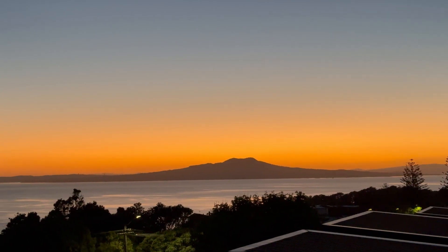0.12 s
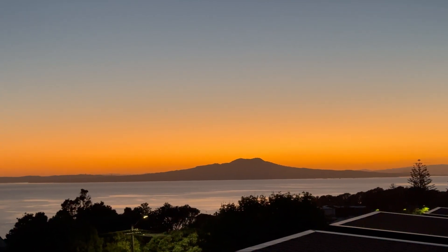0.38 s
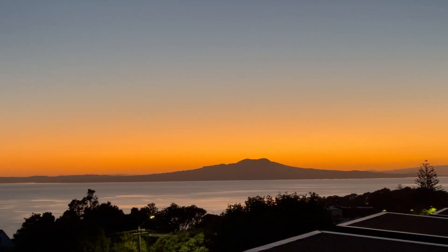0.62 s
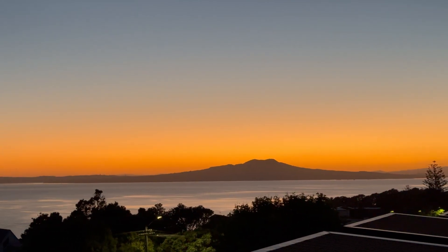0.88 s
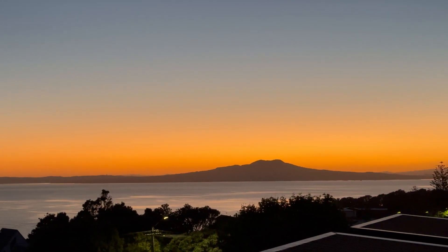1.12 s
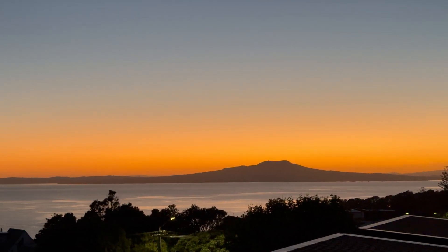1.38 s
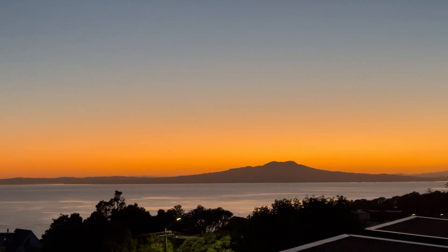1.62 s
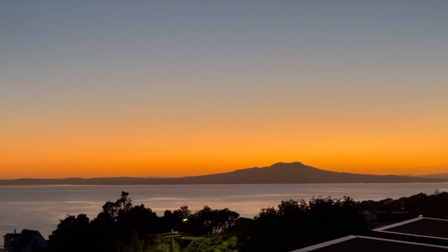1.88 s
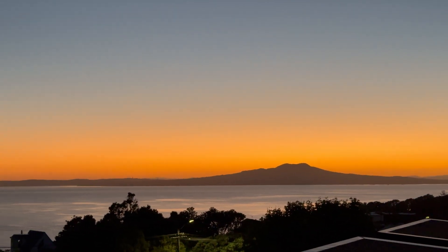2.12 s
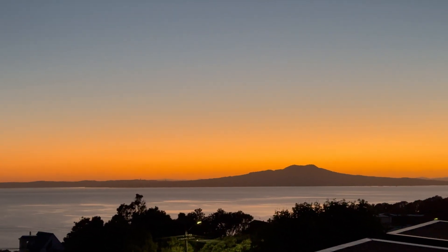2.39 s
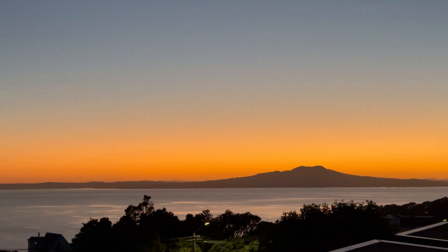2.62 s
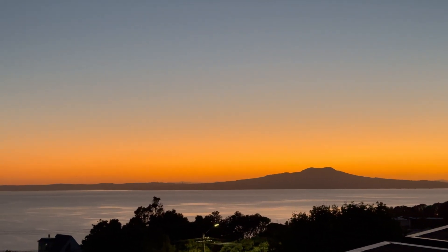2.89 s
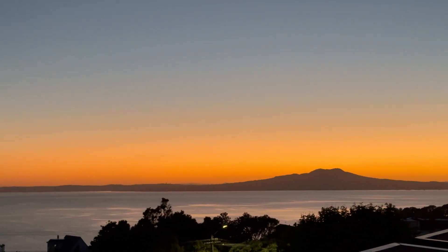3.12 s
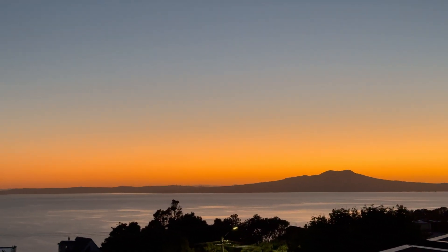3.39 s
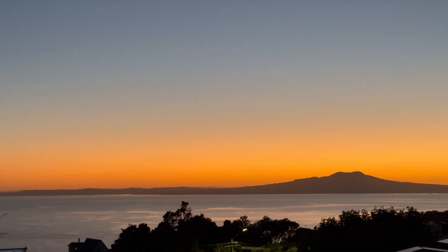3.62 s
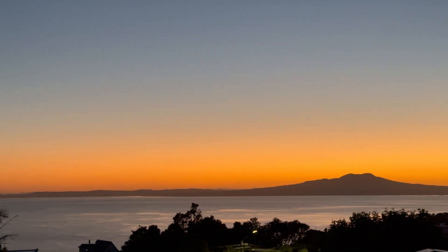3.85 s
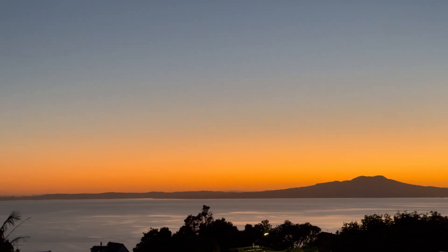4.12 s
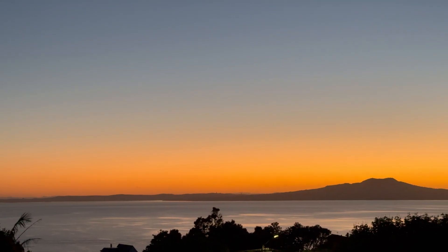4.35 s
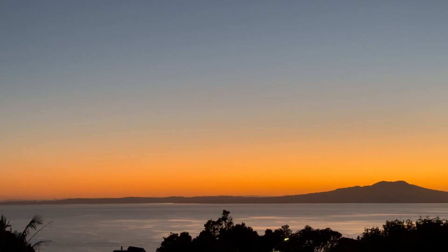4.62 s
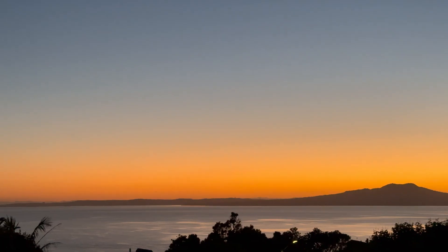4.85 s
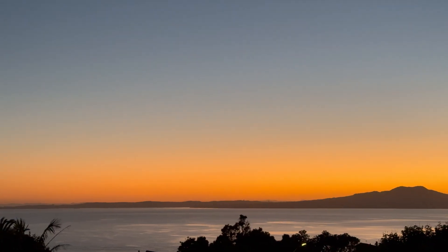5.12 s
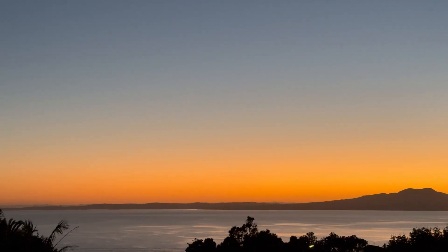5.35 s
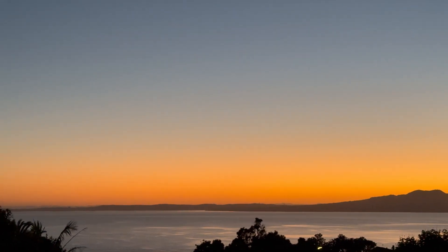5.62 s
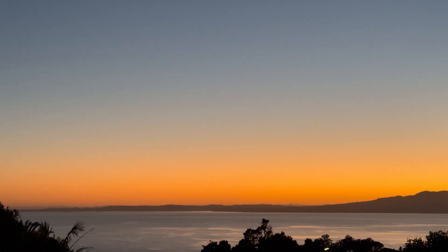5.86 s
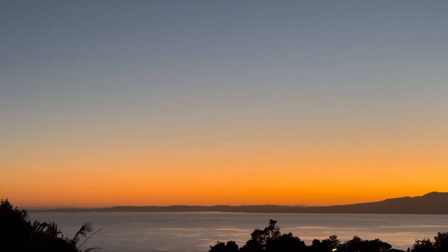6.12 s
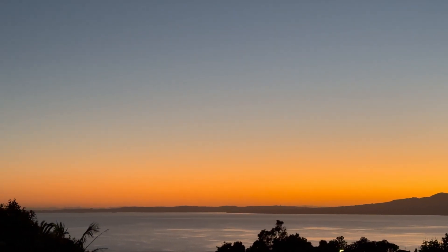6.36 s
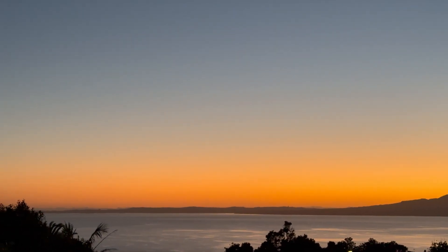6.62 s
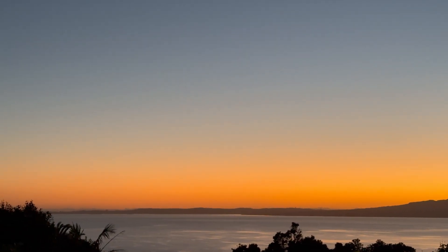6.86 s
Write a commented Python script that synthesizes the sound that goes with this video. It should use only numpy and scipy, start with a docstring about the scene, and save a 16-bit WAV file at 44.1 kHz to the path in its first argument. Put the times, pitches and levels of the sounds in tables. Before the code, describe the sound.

Open garden at dawn, heard through a small stereo microphone. Busy twittering and thin whistles open, cut by two bright near chirps with a dry, rapid rattle between them. Fluid gliding notes follow, joined by a burst of far sparrow chatter, then softer chopped trills and sparser calls. Everything rings gently off trees and walls above a quiet, smooth rumble of town and sea, with slight deep breeze.

```python
"""Dawn chorus from a hillside garden above a bay, a two-port microphone in the open; 7 s.
Throughout, distant singers merge into a wash of short glides over noise-made rumble of town and sea, with breeze.
First come whistles and far sparrows; a shaking near chirp at 0.3 s, a rattle of quick falls at 0.7 s, a second at 1.2 s.
Then gliding, mostly thrush-like notes and chopped trills lead; far sparrows, warbling sines, return from 2.8 and 6.1 s.
Random echoes stand for trees and house walls and smear every note; a treble hiss follows the birds' loudness."""
import sys
import numpy as np
from scipy import signal
from scipy.fft import rfft, irfft
from scipy.io import wavfile
from scipy.ndimage import uniform_filter1d

SR = 44100
rng = np.random.default_rng(int(sys.argv[2]) if len(sys.argv) > 2 else 0)


def log_audio(samples):
    """Write samples as a 16-bit WAV file to the path given in sys.argv[1]."""
    # one column per channel
    frames = np.atleast_2d(samples).T
    # limit to full scale, then quantise
    limited = np.clip(frames, -1, 1)
    pcm = np.round(limited * 32767).astype(np.int16)
    wavfile.write(sys.argv[1], SR, pcm)


def field_ratio(decibels):
    """Amplitude ratio for a level in dB (20 dB per decade); scalars and array-likes work."""
    return 10 ** (np.asarray(decibels, dtype=float) / 20)


N = 308259
T = np.arange(N) / SR  # time [s]

# Bird levels are those of the dry voice, ahead of echoes and microphone response.
# town and sea, ahead of small random swells: (time [s], level [dB])
RUMBLE_LEVEL = [(0.0, -54), (1.2, -54), (1.8, -57), (3.2, -56.5), (5.12, -60), (6.99, -57.5)]
# breeze on the microphone: (time [s], level [dB])
BREEZE_LEVEL = [(0, -54), (.7, -69.5), (1.2, -57), (1.9, -64.5), (2.7, -73), (3.3, -63.5), (4.2, -86.5),
                (5.4, -79.5), (6.2, -62), (6.99, -61)]
# rumble spectra, common to both ports and differing between them: (frequency [Hz], relative level [dB per Hz])
RUMBLE_MID_SPECTRUM = [(20, -53), (40, -28), (63, -9), (109, -1), (260, -9.5), (385, -11.5), (800, -20.5),
                       (1470, -24.5), (2500, -13.5), (4000, -39.5), (5200, -53.5), (13400, -57)]
RUMBLE_SIDE_SPECTRUM = [(15, -51.5), (25, -15), (98, -3), (705, -3), (1510, -12), (2920, -27.5),
                        (3330, -35), (4440, -41.5), (6590, -42), (13400, -40)]
# wash of distant singers, echoes included: (time [s], level [dB])
CROWD_LEVEL = [(0.0, -61.5), (0.53, -51), (1.3, -56), (1.8, -65.5), (2.3, -67.5), (2.9, -62.5),
               (3.5, -69.5), (4.3, -55), (5.1, -67.5), (5.6, -71.5), (5.9, -94.5), (6.11, -76.5),
               (6.5, -60), (6.99, -66)]
# far sparrows, one table a chirp, ahead of warble and flutter: (time [s], pitch [Hz], level [dB])
FAR_CHIRPS = [
    [(0.0, 4130, -41.5), (.03, 4060, -69)],
    [(.068, 4530, -53), (.085, 4560, -56), (.104, 4750, -49.5), (.122, 4190, -51.5), (.15, 4100, -55.5),
     (.16, 4000, -61)],
    [(.163, 4150, -56), (.2, 4040, -54.5), (.215, 3480, -52), (.232, 3170, -49), (.262, 2840, -64)],
    [(.61, 3960, -44), (.64, 4270, -50), (.662, 4100, -35)],
    [(.665, 5020, -46), (.685, 4810, -44), (.697, 3984, -39), (.718, 4123, -40), (.75, 3995, -53),
     (.815, 3910, -55)],
    [(.865, 3900, -39), (.9, 3900, -60.5), (.93, 4050, -66), (.96, 4120, -56.5), (.995, 4130, -56.5)],
    [(1.003, 4420, -67), (1.015, 5080, -66), (1.035, 4720, -50), (1.045, 4500, -47.5), (1.052, 3565, -48),
     (1.085, 3580, -62), (1.12, 3526, -51), (1.2, 3600, -72)],
    [(2.83, 4460, -59), (2.842, 5500, -68.5), (2.855, 4600, -55), (2.874, 4700, -50), (2.884, 3960, -54),
     (2.91, 4055, -50.5), (2.945, 4280, -60)],
    [(2.944, 5630, -65), (2.955, 4720, -54.5), (2.97, 4440, -48), (3.0, 3917, -47), (3.03, 3790, -58.5),
     (3.065, 3700, -54)],
    [(3.102, 5950, -63), (3.122, 4270, -52), (3.135, 4290, -54.5)],
    [(3.138, 5300, -51), (3.152, 4250, -51), (3.17, 3950, -50.5), (3.19, 4290, -56), (3.215, 3976, -56),
     (3.24, 4260, -54), (3.268, 4150, -54.5), (3.285, 4030, -64)],
    [(3.172, 4500, -54), (3.195, 4750, -54.5), (3.24, 4650, -69), (3.28, 4500, -58)],
    [(3.368, 4770, -62.5), (3.388, 4620, -59.5), (3.4, 3650, -31.5)],
    [(3.412, 4400, -47), (3.435, 4180, -58), (3.46, 4270, -45), (3.51, 4250, -76)],
    [(3.52, 3170, -58), (3.54, 3900, -61.5), (3.548, 5600, -75), (3.56, 5030, -69), (3.72, 4880, -93)],
    [(3.585, 4500, -50), (3.615, 4490, -54), (3.63, 3930, -46), (3.66, 3937, -42.5), (3.705, 3870, -74)],
    [(3.745, 4700, -68.5), (3.765, 3920, -47), (3.805, 3884, -49.5), (3.845, 4080, -54), (3.88, 3830, -58),
     (3.92, 3870, -57), (3.95, 4110, -55), (3.97, 3790, -61)],
    [(4.008, 4090, -95), (4.1, 4035, -74), (4.18, 3566, -70.5)],
    [(4.478, 3700, -81), (4.72, 3530, -74)],
    [(6.4, 3500, -65), (6.44, 3090, -71), (6.5, 3080, -68)],
    [(6.112, 4350, -68.5), (6.135, 4060, -63.5), (6.155, 3930, -60.5), (6.19, 3820, -73), (6.22, 3740, -65),
     (6.265, 3595, -54.5), (6.3, 3250, -61)],
    [(6.318, 3275, -52.5), (6.342, 4020, -53), (6.38, 4460, -65.5), (6.4, 4400, -54.5), (6.425, 4000, -62),
     (6.44, 3950, -49.5), (6.46, 3870, -75), (6.5, 3560, -49.5)],
    [(6.325, 4720, -55.5), (6.385, 5000, -67), (6.425, 4800, -64)],
    [(6.575, 4500, -65), (6.61, 4070, -56.5), (6.65, 3700, -55), (6.675, 3990, -55), (6.69, 3520, -56),
     (6.72, 3510, -61)],
    [(6.768, 3640, -50), (6.79, 3503, -60), (6.815, 3410, -54)],
    [(6.862, 4500, -66), (6.88, 4070, -59), (6.9, 3630, -58), (6.915, 3960, -62)],
    [(6.922, 3850, -50), (6.945, 4110, -54), (6.965, 4010, -58), (6.989, 3950, -52.5)],
]
# single whistles, each a glide through three pitches, level partway through:
# (time [s], length [s], start pitch [Hz], middle pitch [Hz], end pitch [Hz], level [dB])
WHISTLES = [ (0.09, 0.15, 3070, 3040, 2800, -58), (0.028, 0.02, 3350, 3560, 3380, -64.5),
            (0.154, 0.045, 2990, 3090, 2870, -58.5), (0.935, 0.086, 1919, 2266, 2225, -47),
            (1.077, 0.079, 1770, 1704, 1720, -64), (1.104, 0.084, 3200, 3030, 2980, -56.5),
            (1.32, 0.12, 3270, 3150, 3120, -60.5), (1.328, 0.14, 4440, 3980, 3630, -53),
            (1.517, 0.047, 2383, 2320, 2060, -51), (1.577, 0.046, 3075, 3000, 3030, -55),
            (1.71, 0.16, 1800, 1950, 2034, -62), (1.801, 0.024, 2890, 3780, 3220, -58),
            (1.834, 0.03, 2780, 3420, 3900, -54.5), (2.127, 0.11, 2360, 2026, 2015, -60),
            (2.262, 0.025, 2905, 2930, 2930, -59), (2.334, 0.14, 3240, 3570, 3410, -60.5),
            (2.418, 0.13, 1820, 2000, 2100, -58), (2.565, 0.11, 2720, 2730, 2990, -54),
            (2.644, .07, 3900, 3870, 4160, -61), (2.755, 0.12, 1582, 1762, 1485, -50.5),
            (2.8, 0.034, 3620, 3540, 3460, -54), (3.024, 0.074, 2045, 2084, 1970, -45),
            (3.114, 0.028, 1860, 1972, 2030, -48.5), (3.072, 0.048, 2384, 2500, 2370, -47),
            (3.201, 0.062, 1836, 1700, 1510, -56), (3.345, .025, 3610, 3290, 3100, -51),
            (3.358, 0.095, 3250, 3163, 3150, -52.5), (3.462, 0.042, 3100, 2830, 2660, -51.5),
            (3.779, 0.031, 3170, 3220, 3500, -45.5), (4.1, 0.062, 1730, 1645, 1985, -57),
            (4.142, 0.067, 1886, 1813, 1665, -59.5), (4.139, 0.084, 3580, 3790, 3930, -65),
            (4.215, 0.061, 6400, 8300, 7200, -75), (4.342, 0.081, 3980, 3970, 3700, -64),
            (4.496, 0.045, 3650, 3650, 3990, -63), (4.207, 0.04, 3580, 3040, 2647, -74),
            (4.577, 0.07, 2450, 2496, 2427, -57.5), (4.623, 0.076, 1960, 2068, 2030, -56),
            (4.815, 0.11, 2790, 2790, 2920, -64.5), (6.053, 0.069, 2360, 2390, 2410, -61),
            (1.985, 0.1, 2673, 2740, 2530, -64), (6.348, 0.078, 2930, 2670, 2880, -53.5),
            (6.697, 0.065, 2197, 2360, 2295, -58.5), (6.43, 0.054, 2110, 2320, 2230, -68.5),
            (6.937, 0.033, 2970, 3140, 2960, -69), (6.519, 0.031, 2380, 2374, 2320, -62.5),
            (6.56, 0.04, 2470, 2180, 2100, -67), (6.789, 0.067, 2330, 2470, 2820, -71),
            (3.738, 0.037, 2800, 2880, 2990, -51.5), (6.901, 0.061, 2550, 2770, 2500, -58.5),
            (6.955, 0.023, 2620, 2500, 2390, -49.5), (6.88, 0.1, 2340, 2220, 2200, -59)]
# low level hoots of a distant bird, level partway through: (time [s], length [s], pitch [Hz], level [dB])
HOOTS = [ (.044, 0.014, 1360, -47), (.09, 0.037, 1300, -65), (.47, 0.39, 1300, -71.5),
         (.49, 0.032, 1710, -70), (.56, 0.019, 1434, -50), (.66, 0.16, 1260, -65), (1.73, 0.086, 1305, -70),
         (1.92, 0.057, 1286, -68.5), (2.05, 0.071, 1320, -70.5), (3.0, 0.09, 1255, -69),
         (3.14, 0.054, 1150, -56.5), (4.49, 0.064, 1373, -75), (4.64, 0.078, 1385, -73.5),
         (4.89, 0.037, 1413, -63.5), (5.02, 0.075, 1392, -70), (5.08, 0.035, 1032, -63.5)]
# gliding phrases and short notes, mostly thrush-like, one high and thin, one table each:
# (time [s], pitch [Hz], level [dB])
PHRASES = [
    [(1.76, 1700, -58), (1.792, 1877, -46.5), (1.85, 1890, -47.5), (1.9, 1740, -53.5), (1.94, 1627, -53.5),
     (1.99, 1633, -49), (2.03, 1874, -47), (2.099, 1861, -68)],
    [(2.109, 2380, -51), (2.132, 2216, -39.5), (2.146, 2200, -52.5)],
    [(2.147, 2388, -34.5), (2.175, 2503, -45), (2.2, 2385, -44.5), (2.257, 2423, -52), (2.282, 2320, -38.5)],
    [(2.286, 2387, -43), (2.303, 2330, -40.5)],
    [(2.307, 2338, -39.5), (2.345, 2566, -40), (2.36, 2380, -72)],
    [(2.553, 6040, -65.5), (2.57, 4150, -50), (2.6, 3490, -62), (2.64, 3200, -51), (2.704, 2914, -49.5),
     (2.75, 2820, -46.5), (2.78, 2668, -37.5), (2.856, 2520, -47.5), (2.881, 2280, -54.5)],
    [(3.536, 2270, -59.5), (3.564, 2600, -58.5), (3.598, 2350, -58), (3.612, 2128, -51), (3.69, 2255, -50),
     (3.755, 2180, -62.5), (3.781, 2547, -51), (3.831, 2190, -66)],
    [(3.993, 2060, -60), (4.027, 2225, -50.5), (4.095, 2443, -54.5), (4.155, 2380, -57),
     (4.186, 2330, -66.5), (4.208, 2200, -54), (4.274, 2220, -59.5)],
    [(5.15, 1750, -66), (5.204, 2110, -51.5), (5.244, 2222, -54.5), (5.29, 2407, -55), (5.334, 2320, -65),
     (5.35, 2236, -51.5), (5.44, 1961, -52), (5.501, 1895, -60)],
    [(5.547, 3020, -65.5), (5.599, 2987, -44), (5.625, 2817, -58), (5.651, 3005, -47), (5.69, 2880, -52),
     (5.733, 2837, -50.5), (5.789, 2790, -70)],
    [(3.36, 6330, -84), (3.383, 6980, -76), (3.397, 6460, -66), (3.407, 6940, -73), (3.435, 6360, -68.5),
     (3.465, 6600, -77), (3.5, 6300, -84)],
    [(5.865, 1945, -53.5), (5.883, 2125, -46), (5.94, 2150, -47), (5.986, 2194, -63)],
]
# trills, ahead of zigzag and chop: (time [s], length [s], start pitch [Hz], end pitch [Hz], level [dB])
TRILLS = [(1.179, 0.077, 2890, 2800, -43), (1.309, 0.1, 2526, 2340, -46.5), (1.374, 0.095, 2340, 2295, -43),
          (3.153, 0.12, 2208, 2490, -48), (4.252, 0.12, 2195, 2338, -55), (4.282, 0.16, 3130, 2790, -65),
          (4.044, 0.083, 2780, 2800, -59), (4.46, 0.19, 2218, 2287, -55), (4.75, 0.091, 2200, 2110, -57.5),
          (4.8, 0.14, 2945, 3000, -63), (4.936, 0.14, 2440, 2275, -56), (4.984, 0.18, 2900, 2735, -63.5),
          (5.47, 0.094, 2270, 2348, -60.5), (5.811, 0.064, 2094, 1764, -55.5),
          (5.62, 0.18, 2790, 2564, -62.5), (6.006, 0.085, 2300, 2250, -64), (6.494, 0.11, 2330, 2207, -75)]
# rattle, a fall and a note after it, levels ahead of swell and fade:
# (time [s], fall length [s], top pitch [Hz], bottom pitch [Hz], fall level [dB], note level [dB])
RATTLE = [(0.685, 0.0085, 2920, 1820, -29, -32), (0.7068, 0.0095, 3360, 1800, -24, -29),
          (0.726, 0.009, 3310, 1780, -26.5, -30.5), (0.7475, .009, 3220, 1720, -23.5, -30),
          (.768, .009, 3380, 1900, -24.5, -33), (0.774, 0.014, 2570, 1963, -31.5, -50.5)]
# treble hiss that follows the rattle's loudness: (frequency [Hz], relative level [dB per Hz])
RATTLE_HISS = [(8000, -26), (10500, 0), (13000, -13), (14500, -39)]
# near sparrow: (time [s], level [dB], quieter at the start by [dB],
# quieter between turning points by [dB], low turns louder than high ones by [dB])
NEAR_CHIRPS = [(.341, -28, 23.5, 4, 1.5), (1.184, -34.5, 15.5, 9.5, 8.5)]
# length of the shaking part of each near chirp: [s]
SHAKE_LENGTHS = .063, .0705
# plain notes of the near birds, one table a note: (time [s], pitch [Hz], level [dB])
NEAR_ENDINGS = [
    [(.404, 4440, -22), (.43, 3796, -27.5), (.445, 4300, -40), (.455, 3843, -27.5), (.465, 4500, -44),
     (.468, 3370, -33.5), (.477, 2370, -29.5)],
    [(1.18, 3330, -35), (1.187, 3220, -40)],
    [(1.227, 3870, -28), (1.236, 3030, -35.5)],
    [(1.253, 4140, -32.5), (1.27, 3930, -31), (1.287, 3820, -33), (1.295, 4250, -36.5),
     (1.301, 5100, -44.5)],
    [(1.3035, 3710, -33), (1.309, 3170, -25.5), (1.318, 3127, -38.5), (1.319, 2970, -48),
     (1.328, 2350, -30)],
    [(6.232, 9040, -62), (6.24, 7650, -51), (6.247, 8430, -45), (6.252, 7350, -56), (6.258, 7630, -39.5),
     (6.263, 5300, -55.5), (6.268, 3570, -51)],
]
# treble hiss that follows the loudness of the birds: (frequency [Hz], relative level [dB per Hz])
FOLLOWING_HISS = [(1500, -26), (3500, 13), (7000, -4.5), (13000, -22)]
# microphone response to the birds: (frequency [Hz], gain [dB])
MICROPHONE = [(1000, -2.5), (8500, -7.5), (9500, -48), (10800, 2), (13000, -5), (14500, -30)]
# phase lead of the left port over the right, negative where it lags: (frequency [Hz], lead [rad])
PORT_LEAD = [(150, 0), (340, -.35), (780, -1.3), (1120, -1.2), (1550, -.25), (1900, -.25), (4000, -.5),
             (6000, -.3), (8500, 1.1)]

# whistle level at its start and end, against that at the given share of its length
LEVEL_SHARE, START_DB, END_DB = 0.44, -0.5, 2
TRILL_PER_S, TRILL_DEPTH_HZ, TRILL_CHOP_DB = 44, 168, 4.5  # depths of a full trill, each way
# below the first level, zigzag and chop shrink by e for each step of the second
TRILL_FULL_DB, TRILL_BLUR_DB = -43, 17
RATTLE_NOTE_HZ, RATTLE_NOTE_S = 2780, 0.012
# middle line of the near chirp at start, halfway and end; greatest swing either way
SHAKE_START_HZ, SHAKE_TOP_HZ, SHAKE_END_HZ, SHAKE_DEPTH_HZ = 3700, 5300, 4500, 1300
# pace at start and end [turns per shaking part]; first phase [turns]
SHAKES_FIRST, SHAKES_LAST, SHAKE_PHASE = 7.3, 4.7, 0.13


def colour(x, points):
    """Weight the spectrum by (Hz, dB) points joined on a log frequency axis."""
    hz, db = np.transpose(points)
    grid = np.maximum(np.fft.rfftfreq(N, 1 / SR), 1)
    gain = field_ratio(np.interp(np.log(grid), np.log(hz), db))
    return irfft(rfft(x) * gain, N)


def unit(x):
    """Scale to rms 1."""
    return x / np.sqrt(np.mean(x ** 2))


def curve(table):
    """A level curve as gain."""
    return field_ratio(np.interp(T, *np.transpose(table)))


def walk(rate):
    """Random levels held 1 / rate s, smoothed twice, rms 1."""
    hold = int(SR / rate)
    steps = np.repeat(rng.standard_normal(N // hold + 1), hold)
    smooth = uniform_filter1d(uniform_filter1d(steps, hold), hold)
    return unit(smooth[:N])


def track(table):
    """Start time of a note and its columns at every sample, corners rounded."""
    s, *columns = np.transpose(table)
    t = np.arange(s[0], s[-1], 1 / SR)
    return s[0], [uniform_filter1d(np.interp(t, s, c), size=90, mode="nearest") for c in columns]


def add(out, start, hz, db, edge, second_db, third_db=-80.):
    """Sing one note: a sine with two overtones and ends rounded over edge seconds."""
    t = np.arange(len(hz)) / SR
    phase = 2 * np.pi * np.cumsum(hz) / SR
    ends = np.sin(np.pi / 2 * np.clip(np.minimum(t, t[-1] - t) / edge, 0, 1)) ** 2
    tone = np.sin(phase) + field_ratio(second_db) * np.sin(2 * phase) + field_ratio(third_db) * np.sin(3 * phase)
    note = np.sqrt(2) * field_ratio(db) * ends * tone
    i = max(int(start * SR), 0)
    out[i:i + len(t)] += note[:N - i]


def garden(x, scatter_db, scatter_s, tail_db, t60):
    """Direct sound, dense echoes off leaves and a long tail; mid and side hear different echoes."""
    t = T[:SR + SR // 2]
    noise = rng.standard_normal((2, len(t)))
    dull = signal.sosfilt(signal.butter(4, 4800, fs=SR, output="sos"), noise)
    treble_left = np.exp(-t / 0.15)  # the treble of the echoes dies away first
    scatter = field_ratio(scatter_db) * np.exp(-t / scatter_s) / np.sqrt(scatter_s * SR)
    tail = field_ratio(tail_db - 60 * t / t60) / np.sqrt(t60 * SR / 14)
    onset = np.minimum(t / 0.0043, 1)
    echoes = (scatter + tail) * onset * (dull + treble_left * (noise - dull))
    echoes[0, 0] = 1  # the direct sound, in mid only
    return signal.fftconvolve(x[None], echoes, axes=1)[:, :N]


def following_hiss(song, spectrum, db):
    """A faint treble hiss, shaped noise that follows the loudness of the song."""
    loudness = np.sqrt(uniform_filter1d(song ** 2, size=900) + 1e-14)
    return loudness * unit(colour(rng.standard_normal(N), spectrum)) * field_ratio(db)


def rumble():
    """Town and sea as smooth noise; breeze adds deep bass nearly alike at both ports."""
    mid = unit(colour(rng.standard_normal(N), RUMBLE_MID_SPECTRUM))
    side = unit(colour(rng.standard_normal(N), RUMBLE_SIDE_SPECTRUM))
    bass = signal.butter(4, [42, 100], "band", fs=SR, output="sos")
    breeze = unit(signal.sosfilt(bass, rng.standard_normal(N))) * curve(BREEZE_LEVEL)
    swell = field_ratio(1.33 * walk(8.8))
    town_and_sea = np.array([mid, field_ratio(-9.5) * side]) * curve(RUMBLE_LEVEL) * swell
    return town_and_sea + np.array([[1], [0.1]]) * breeze


def crowd(count=330):
    """Many distant singers: short arched glides, nearly all echo, that merge into a fluttering wash."""
    out = np.zeros(N)
    for when, pitch, long, bend, arch, size in rng.random((count, 6)):
        u = np.linspace(-1, 1, int((0.028 + 0.12 * long) * SR))
        hz = 1750 + 1700 * pitch ** 1.5 + 600 * (bend - 0.55) * u + 500 * (arch - 0.5) * u ** 2
        hz = hz + 250 * pitch * np.sin(9 * u)  # the higher voices twitter
        add(out, when * N / SR, hz, -18 * size - 10 * pitch ** 3, 0.012, -48)
    wash = garden(out * field_ratio(3.5 * walk(60)), 1, 0.03, 4, 0.9)
    return wash / np.std(wash[0]) * curve(CROWD_LEVEL)


def far_sparrows():
    """Both halves of the voice box sing: a beaded main strand with a fine warble and a weak, hoarse one around it."""
    out = np.zeros(N)
    main, hoarse = (0, 95, 40, 0), (350, 300, 130, -8)
    for gap_hz, depth_hz, hoarse_hz, strand_db in (main, hoarse):
        turns = 2 * np.pi * np.cumsum(85 + 30 * walk(30)) / SR  # about 85 warbles a second
        regular = depth_hz * (1 + 0.4 * walk(20)) * np.sin(turns)
        warble = gap_hz + regular + hoarse_hz * walk(250)
        flutter = strand_db - 5 * np.cos(turns) + 3 * walk(40) + 3 * walk(130)
        for start, (hz, db) in map(track, FAR_CHIRPS):
            here = (int(start * SR) + np.arange(len(hz))) % N
            add(out, start, np.minimum(hz + warble[here], 5600), db + flutter[here], 0.008, -48)
    return garden(out, -2, 0.03, 0, 0.8)


def arched_note(s, length, first, middle, last, db):
    """A whistle's pitch bends through three points as its level rises slightly throughout, loudest at the end."""
    u = np.linspace(-1, 1, int(length * SR))
    hz = middle + (last - first) / 2 * u + ((first + last) / 2 - middle) * u ** 2
    rise = np.interp((u + 1) / 2, [0, LEVEL_SHARE, 1], [START_DB, 0, END_DB])
    return s, (hz, db + rise)


def trill(s, length, first, last, db):
    """A trill's pitch zigzags along a glide while its level is chopped into pulses."""
    t = T[:int(length * SR)]
    turns = 2 * np.pi * TRILL_PER_S * t
    clear = np.exp(min(db - TRILL_FULL_DB, 0) / TRILL_BLUR_DB)
    glide = first + (last - first) * t / length
    hz = glide + clear * TRILL_DEPTH_HZ * np.sin(turns)
    return s, (hz, db + clear * TRILL_CHOP_DB * np.cos(turns))


def whistles():
    """Clear gliding notes a few gardens away; high ones quaver most, and moving air makes them flutter."""
    out, quaver = np.zeros(N), 0.0035 * walk(90)
    notes = [track(phrase) for phrase in PHRASES]
    notes += [arched_note(*whistle) for whistle in WHISTLES]
    notes += [arched_note(s, length, hz, hz, hz, db) for s, length, hz, db in HOOTS]
    notes += [trill(*row) for row in TRILLS]
    for start, (hz, db) in notes:
        here = np.roll(quaver, -int(start * SR))[:len(hz)]
        width = np.minimum(hz / 2400, 1.7) ** 2
        add(out, start, hz * (1 + width * here), db, 0.004, -48)
    flutter = field_ratio(1.8 * walk(60) + 2 * walk(140))
    return garden(out * flutter, -7, 0.02, -4, 1.1)


def rattle():
    """A row of quick falls close by, each followed by a short fading note; a treble hiss follows their loudness."""
    out = np.zeros(N)
    fade_db = np.linspace(0, -7, int(RATTLE_NOTE_S * SR))
    note_hz = np.full(len(fade_db), float(RATTLE_NOTE_HZ))
    for s, length, top_hz, bottom_hz, db, note_db in RATTLE:
        left = np.linspace(1, 0, int(length * SR))  # share of the fall still to come
        fall_hz = bottom_hz + (top_hz - bottom_hz) * left ** 1.5
        fall_db = db - 14 * left ** 3 - 5 * (1 - left)
        add(out, s, fall_hz, fall_db, 0.003, -38)
        add(out, s + length, note_hz, note_db + fade_db, 0.003, -38)
    out = garden(out, -15, 0.03, -7, 1.0)
    return out + following_hiss(out[0], RATTLE_HISS, -41)  # the same hiss in mid and side


def near_birds():
    """Near chirps shake widely, ever slower, beside plain notes of gliding pitch."""
    out = np.zeros(N)
    for (s, db, swell_db, dip_db, low_db), length in zip(NEAR_CHIRPS, SHAKE_LENGTHS):
        u = np.linspace(0, 1, int(length * SR))
        arch = np.sin(np.pi * u) ** 0.34
        line = SHAKE_START_HZ + (SHAKE_END_HZ - SHAKE_START_HZ) * u
        middle = line + (SHAKE_TOP_HZ - (SHAKE_START_HZ + SHAKE_END_HZ) / 2) * arch
        turns = SHAKE_PHASE + SHAKES_FIRST * u + (SHAKES_LAST - SHAKES_FIRST) * u ** 2 / 2
        shake = np.cos(2 * np.pi * turns)  # 1 at the low turns, -1 at the high ones
        hz = middle - SHAKE_DEPTH_HZ * arch * shake
        db = db - swell_db * (1 - u) ** 3.6 - dip_db * (1 - shake ** 2) + low_db * shake / 2
        # second overtone level is strongest at the low turns, the third grows with level
        add(out, s, hz, db, 0.002, second_db=-23 + 7 * shake, third_db=1.3 * db + 12.5)
    for ending in NEAR_ENDINGS:
        start, (hz, db) = track(ending)
        add(out, start, hz, db, 0.002, second_db=-19, third_db=1.8 * db + 10)
    return garden(out, -16.0, 0.058, -0.54, 0.66)


def scene():
    """Sound reaches one microphone port slightly ahead, which turns part of the mid into side."""
    mid, side = crowd() + far_sparrows() + whistles() + rattle() + near_birds()
    mid = colour(mid + following_hiss(mid, FOLLOWING_HISS, -27.5), MICROPHONE)
    side = colour(side, MICROPHONE)
    mid, side = np.array([mid, field_ratio(-24.0) * side]) + rumble()
    lead = np.interp(np.fft.rfftfreq(N, 1 / SR), *np.transpose(PORT_LEAD))
    turned = 1j * np.tan(np.clip(lead, -2.4, 2.4) / 2) * rfft(mid)
    side = side + irfft(turned, N)
    return np.array([mid + side, mid - side])


def low_pass(x):
    """Removes everything above the highest recorded frequency."""
    return signal.sosfilt(signal.butter(12, 15700, fs=SR, output="sos"), x)


def record(dry):
    """Take the finished two-port mix as the phone stores it."""
    return low_pass(dry)


dry = scene()
out = record(dry)
log_audio(out)
```